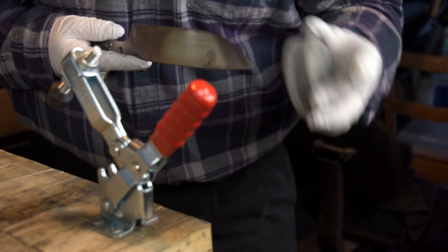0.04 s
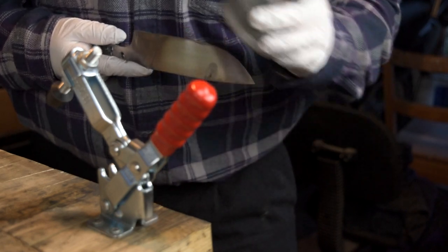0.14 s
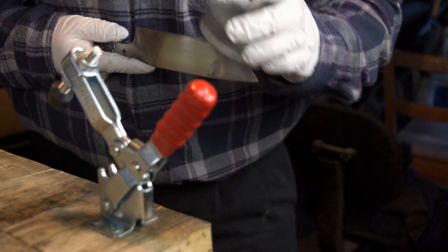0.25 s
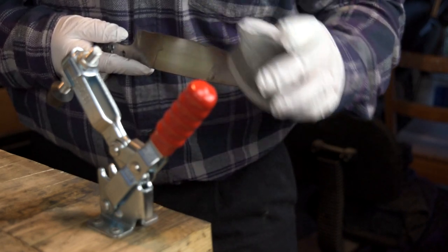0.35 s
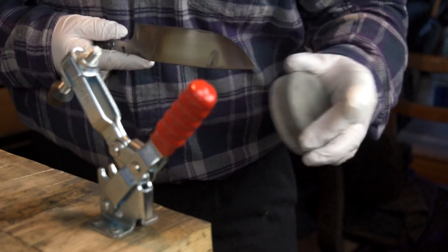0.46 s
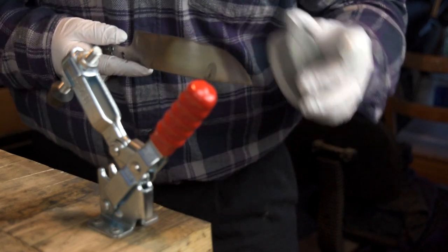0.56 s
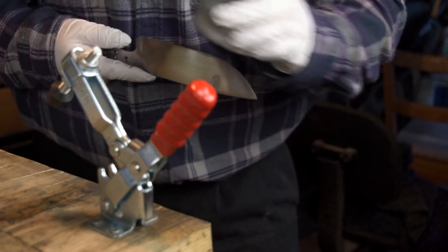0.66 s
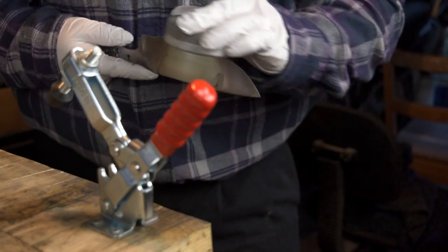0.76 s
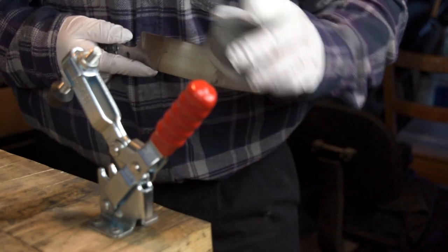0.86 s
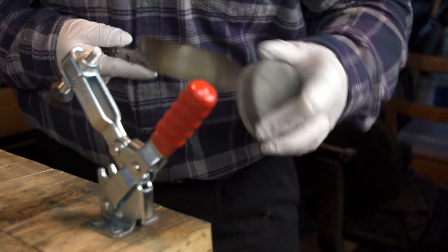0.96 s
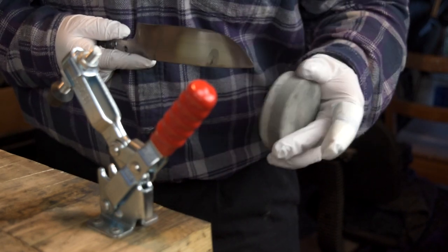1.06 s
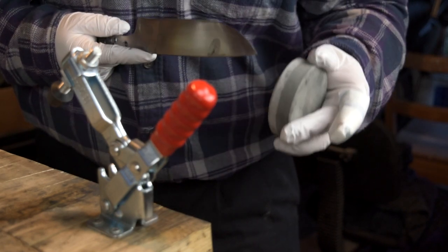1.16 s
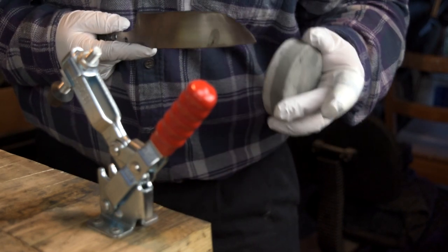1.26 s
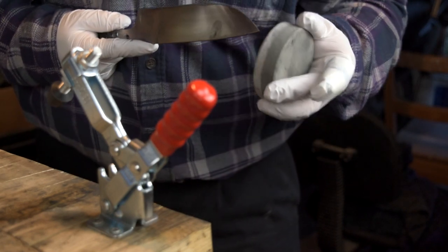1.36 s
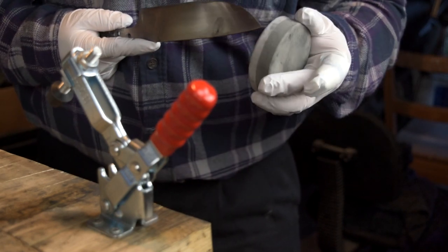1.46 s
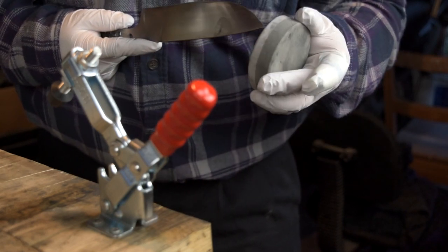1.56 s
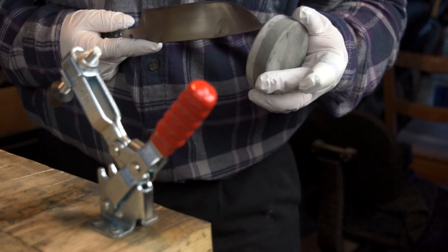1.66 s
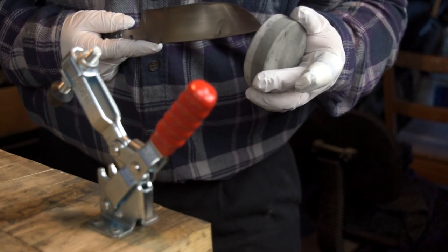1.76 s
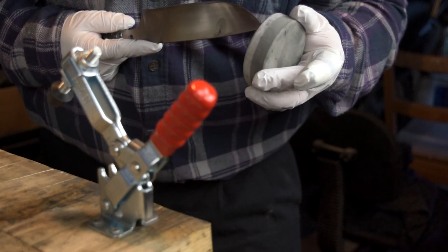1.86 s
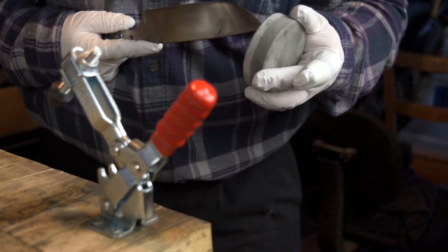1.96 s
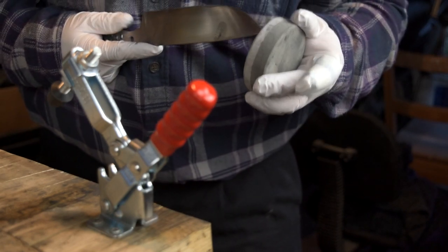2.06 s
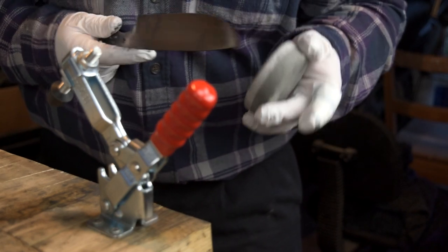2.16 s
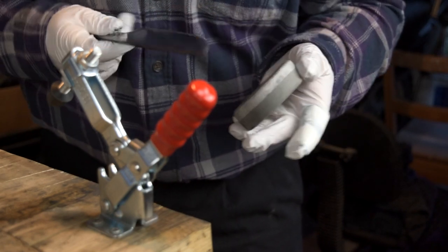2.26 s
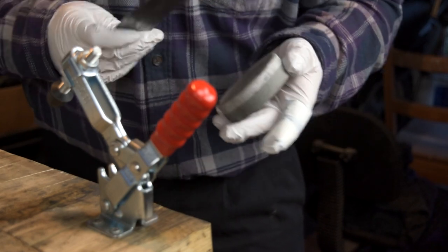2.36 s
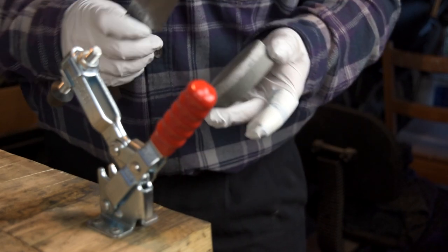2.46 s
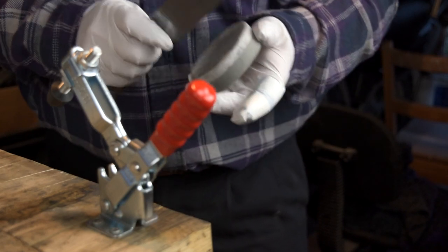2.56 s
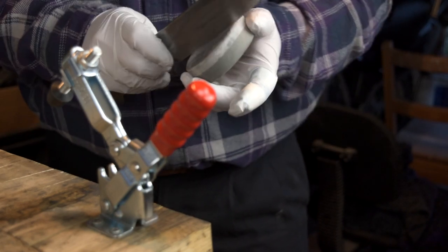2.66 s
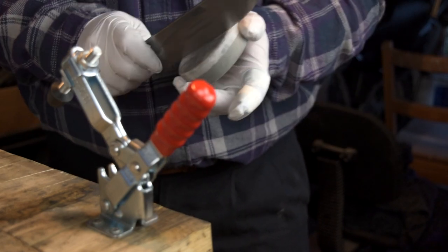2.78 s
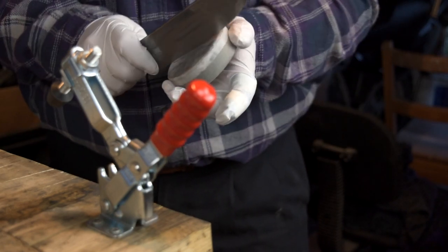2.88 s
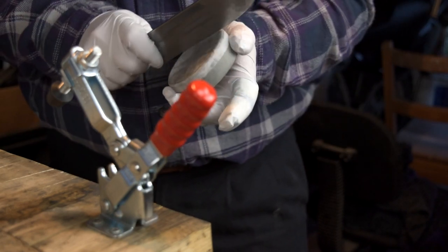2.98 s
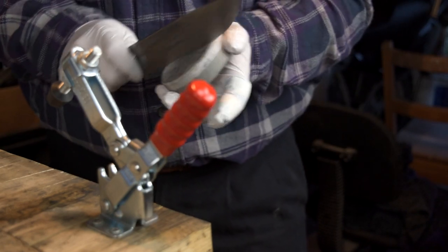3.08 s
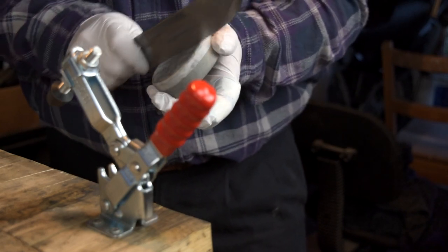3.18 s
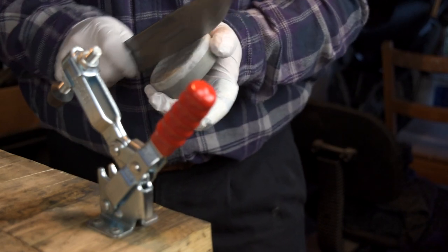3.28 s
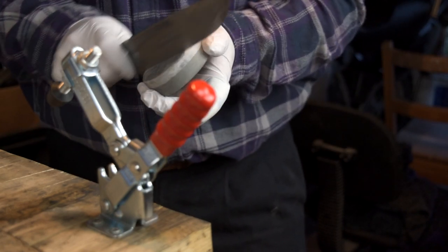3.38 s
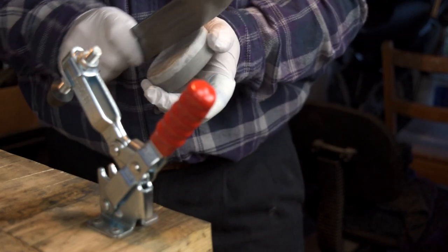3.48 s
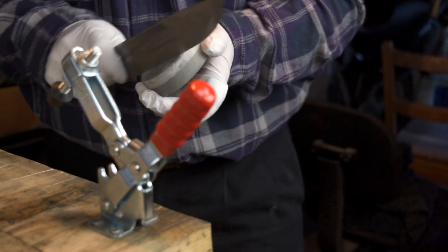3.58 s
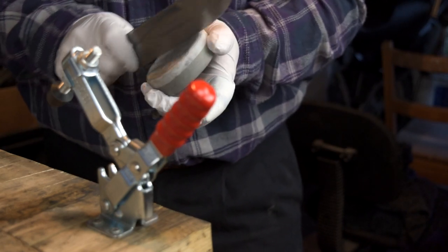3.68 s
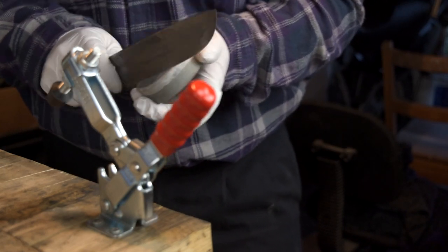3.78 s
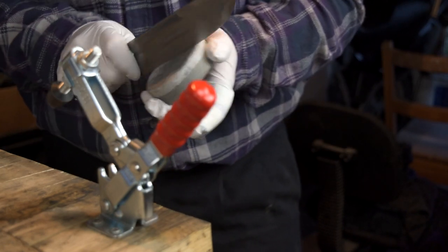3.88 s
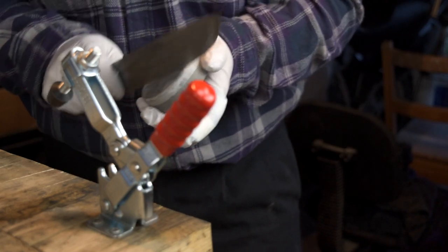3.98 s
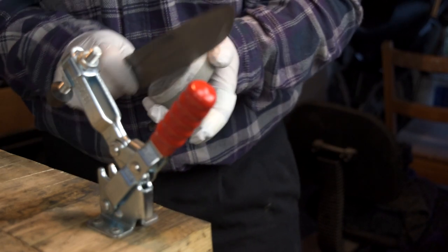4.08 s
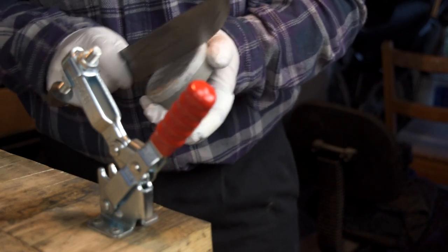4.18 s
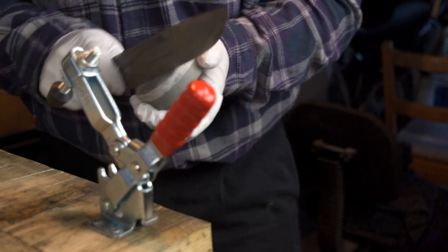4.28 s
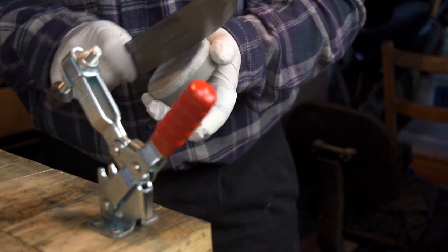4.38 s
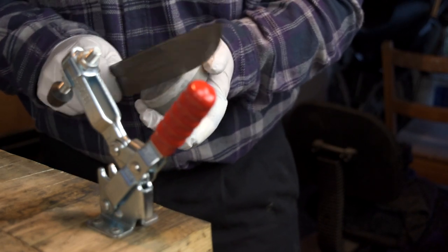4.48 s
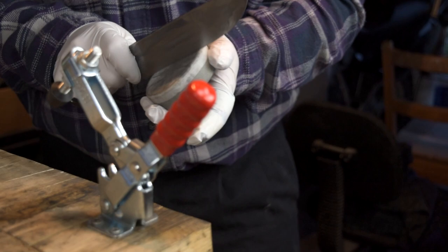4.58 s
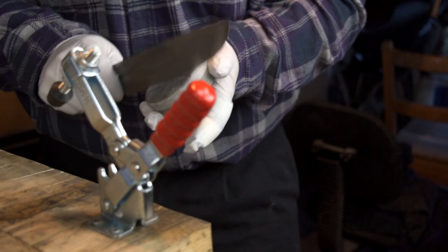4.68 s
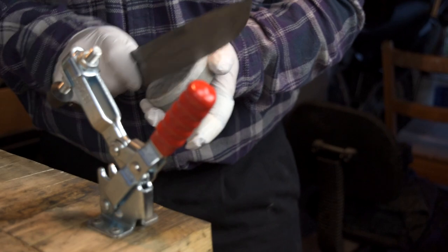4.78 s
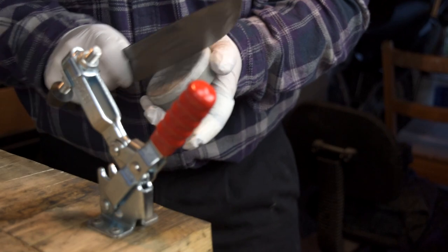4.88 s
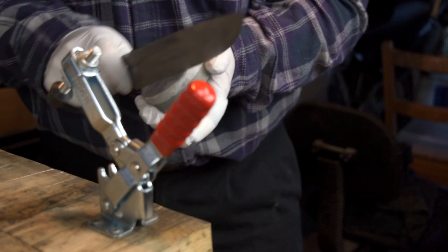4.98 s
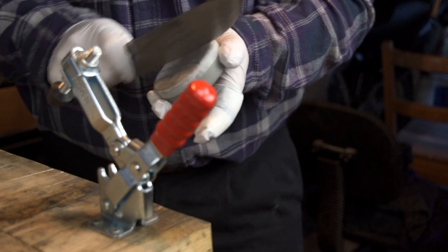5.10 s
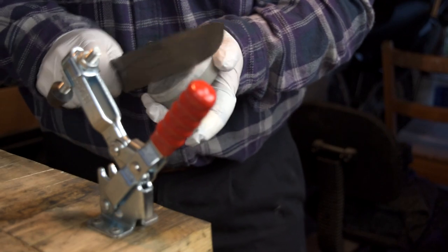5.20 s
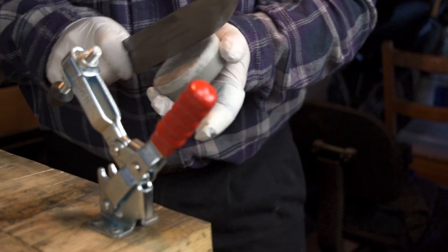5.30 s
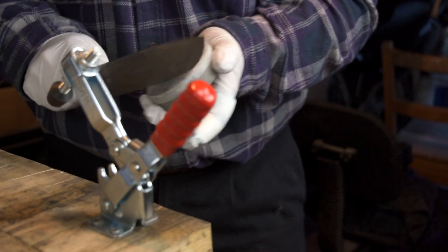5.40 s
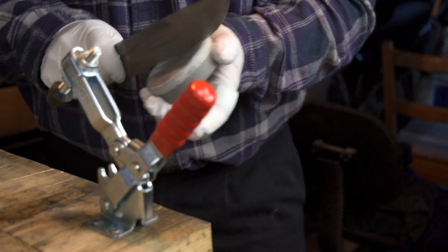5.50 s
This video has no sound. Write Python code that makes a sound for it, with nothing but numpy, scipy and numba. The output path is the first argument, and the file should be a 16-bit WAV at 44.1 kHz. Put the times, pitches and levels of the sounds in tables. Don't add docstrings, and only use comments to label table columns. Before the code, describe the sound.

A quiet, small workshop, heard close and in mono, with soft low air noise and faint machine hum. Gloves rub barely audibly before a hard, dull stone-on-steel clack at 0.25 s opens a short gritty drag, fading by 0.47 s with a light tick. A second clack at 0.76 s starts another hissing drag until about 1.02 s, ending in small taps. Then near silence, with a faint tick at 1.75 s. From 2.05 to 2.68 s gloves softly rub steel with tiny clicks, and slight low handling rumble begins. Strong knocks at 2.69 and 2.83 s and a brief drag lead to rapid strokes from 2.94 s, with more sharp knocks near 2.97 and 3.0 s. About nine scrapes per second alternate push and pull, raspy, with blade ringing around 3.4 kHz, irregular grain catches and a hollow tone that flares upward on pulls and gradually rises, continuing to about 5.56 s.

```python
import sys
import numpy as np
from scipy import signal
from scipy.fft import rfft, irfft, next_fast_len
from scipy.io import wavfile
from scipy.ndimage import uniform_filter1d, minimum_filter1d
from numba import njit

SR = 44100
rng = np.random.default_rng(int(sys.argv[2]) if len(sys.argv) > 2 else 0)


def store_pcm(level_fs):
    pcm = np.round(np.clip(level_fs, -1, 1) * 32767).astype(np.int16)
    wavfile.write(sys.argv[1], SR, np.atleast_2d(pcm).T)


def level_to_linear(level):
    exponent = np.asarray(level, float) / 20
    return 10 ** exponent


N = 244572

# t/s, share of the stroke at top speed (0-1), pressure level/dB, main mode relative level/dB
STROKES = [(2.939, 0.31, -23, 5.5), (3.057, 0.47, -21.5, -2), (3.174, 0.4, -22.5, 4),
           (3.288, 0.56, -20.5, 0), (3.404, 0.53, -21.5, 1.5), (3.517, 0.49, -19.5, 3.5),
           (3.622, 0.39, -21.5, -1.5), (3.735, 0.41, -22.5, 6.5), (3.841, 0.37, -21, 7),
           (3.965, 0.37, -21.5, 8.5), (4.076, 0.43, -21.5, 2.5), (4.199, 0.41, -21.5, 5),
           (4.316, 0.44, -21.5, 2.1), (4.431, .49, -20, 6), (4.534, 0.51, -23.5, 0),
           (4.664, 0.47, -22, -5.5), (4.768, .46, -22, 3.5), (4.9, 0.45, -22.5, 5.5),
           (5.012, 0.45, -22.5, 2.5), (5.131, 0.6, -21, -3), (5.231, 0.31, -23, 9),
           (5.357, 0.49, -20.5, -4), (5.463, 0.59, -23.5, 1.5)]
LAST_TURN_S = 5.562
TURN_DB, STROKE_SHAPE = -13, 1.426
# opening/octave, coupling level/dB
PALM_CUPPING = [(0.48, -1), (0.3, -2.5), (-0.061, 0), (0.11, -2.3), (-0.045, -1.2), (0.085, 0),
                (-0.14, -0.3), (0.098, 1.2), (-0.004, -0.4), (-0.11, .6), (-.03, -0.8), (0.0049, 2),
                (0.0087, 4.5), (0.087, -3.5), (0.11, 1.7), (-0.005, -0.5), (-0.032, -1.8), (-0.07, -0.5),
                (-0.022, 1.6), (0.11, 0.5), (0.12, -3.5), (0.17, 2.5), (-0.089, -0.2)]
# t/s, peak level/dB
SNAGS = [(3.0703, 19.5), (3.2, 2), (3.338, 8), (3.4219, 11), (3.7741, 16), (3.8215, 16), (3.8744, 7),
         (3.9911, -1), (4.141, 13), (4.4606, -4), (4.7292, 16.5), (4.9305, 4), (4.71, -5), (4.958, 21),
         (5.0535, -11), (5.068, -13), (5.264, 6), (5.3946, 10)]
# f/Hz, width/Hz
MAIN_MODE = (3395, 76)
BLADE_HZ = [4500, 5570, 6930, 7720, 8390, 9560, 11200, 12700, 13600, 14500, 1705, 1985, 2585, 2880, 3720]
# width/Hz, level/dB
UPPER_MODES = [(154, 4), (133, 3), (129, 3.5), (88.889, 1), (167, -5.5), (231, -1.5), (175.93, -17),
               (230, -6.5), (101.85, -11), (150, -20)]
# width/Hz, level/dB
LOWER_MODES = [(67.5, -2), (146, -34.5), (118.8, 3), (270, 7.5), (117, -5)]
NARROWEST_HZ = 70
PITCH_BEND = .011
UPPER_DB, PULL_UPPER_DB = 4, -1.86
# f/Hz, density level/dB per Hz
RASP = [(1000, -18), (2000, 3.5), (3200, 8), (4200, -2.5), (6300, -3.5), (9000, -4.5), (12000, -4.5),
        (15500, -14)]
RASP_DB, PULL_DIP_DB = 2, -4.5
HOLLOW_DB, PULL_HOLLOW_DB, HOLLOW_TRADE = -1.16, -1.5, 0.27
HOLLOW_HZ, LOOSEN_OCT_PER_S, OPEN_OCT, OPEN_S, CLOSE_S = 524, 0.21, 0.91, 0.018, 0.043

# t/s, pressure level/dB, bite on the edge level/dB, body peak f/Hz
DRAGS = [
    [(0.262, -23.5, -8, 3110), (0.3, -39.5, 4, 2610), (0.354, -29, -9, 2430), (0.44, -42, 10.5, 2840),
     (0.467, -41.5, 3.5, 2710)],
    [(0.772, -41, -36, 2430), (0.8, -34.5, -2.5, 2300), (0.888, -32, -2.5, 2780), (0.99, -31, 0.5, 2340),
     (1.01, -26, 7, 2710), (1.021, -45.5, 16, 2660)],
    [(2.835, -22, -12, 2500), (2.853, -42, -22, 2220), (2.88, -42, -6, 2300), (2.89, -33, 1, 2500),
     (2.905, -49, -5, 2600), (2.92, -31.5, 2.5, 2700), (2.945, -46, -28, 2730)],
]
# f/Hz, width/Hz, level/dB
DRAG_MODES = [(1285, 160, -3), (3820, 160, -6), (4580, 67, -1.5), (5920, 53, -4.5), (6970, 88, -3.5),
              (8350, 250, 4), (8330, 85, 1.5), (9900, 270, -8), (10350, 240, -15.5), (11060, 180, -2.5),
              (13800, 250, -7.5)]
# f/Hz, density level/dB per Hz
DRAG_HISS = [(290, -49), (500, -3), (876, -20), (1170, -18), (1800, 3.5), (2840, -27), (4250, -1.5),
             (8480, 2), (15500, -23)]
PALM_DB, PALM_FADE_DB_PER_S = -2.5, 230

# t/s, level/dB, brightness on bare steel level/dB
GLOVE_SLIDES = [
    [(0.0, -51, -12), (0.214, -57.5, -10), (0.235, -68, -27)],
    [(1.06, -54, 6), (1.11, -61, -13), (1.55, -76, -6)],
    [(2.05, -75, -10), (2.082, -58.5, -7), (2.27, -50, 1), (2.5, -48.5, -11), (2.532, -42.5, 2.5),
     (2.574, -47.5, -7), (2.66, -50, -5), (2.685, -41, -25)],
]
# f/Hz, density level/dB per Hz
GLOVE_TONE = [(290, -17), (500, 6), (578, -2), (669, 2), (2010, -5), (3280, 2), (3800, -5.5), (4480, 1),
              (6000, -22), (7800, -46), (13200, -120)]
# f/Hz, width/Hz, level/dB
GLOVE_MODES = [(4500, 81, -9), (5640, 130, 1), (7180, 68, 0), (8140, 180, 0)]

# t/s, peak level/dB, knock f/Hz, knock t60/s, ring relative level/dB
LANDINGS = [
    (0.2514, 2, 1750, 0.007, -16),
    (.761, 0.5, 1694, 0.006, -10),
]
# delay t/s, level/dB, pitch ratio
BOUNCES = [(.0008, -10, 1.9), (.0025, -8, 1.38), (.0053, -12, 1.18), (.01, -24, 1.2)]
BOUNCE_T60_S, BOUNCE_RING_DB = 0.013, -20
# t/s, peak level/dB, knock f/Hz, knock
# t60/s, ring relative level/dB
TAPS = [(0.4336, -22.5, 2930, 0.018, -3), (.998, -28, 690, 0.027, -14), (1.0101, -28, 1560, 0.021, -11),
        (1.0137, -32, 2630, 0.0098, 3), (1.754, -33.5, 1220, 0.014, -2), (2.103, -46.5, 3040, 0.01, 8),
        (2.153, -44, 3400, .01, -12), (2.41, -49, 4500, 0.15, -30), (2.431, -38.5, 4500, 0.11, -30),
        (2.195, -45, 3600, .01, -3), (2.529, -29.5, 3370, 0.034, -2), (2.8253, -3, 2870, 0.013, -26),
        (2.826, -1.5, 1930, 0.012, -25), (2.845, -18, 2040, 0.016, -22), (2.961, -21, 510, 0.033, -24),
        (2.9719, 1.5, 2740, 0.0077, -5.5)]
# t/s, peak level/dB, knock f/Hz, knock t60/s, ring relative level/dB
GLANCES = [
    (2.691, -3.5, 1830, 0.009, -9),
    (3.0052, -6.5, 3330, 0.015, -7.5),
]
# f/Hz, level/dB, t60/s
FREE_BLADE = [(1421, -20, .1), (2546, -4, .09), (3714, -22, .15), (4495, -14, .06), (4883, -25, .12),
              (5669, -1, .03), (6966, -4, .035), (7747, -5, .06), (8500, -6, .03), (9690, -7, .035),
              (11400, -13, .02)]
PRESSED_FREE, TOUCHED_FREE, GLANCED_FREE = .08, .35, .8
CRACK_DB, CRACK_T60_S, CRUSH_T60_SHARE, CRUSH_WIDTH = -9, .013, 1.3, .45

SHOP_T60_S, SHOP_DB, WALL_CUT_HZ = 0.31, -19, 1350
# f/Hz, density level/dB per Hz
AIR = [(15, -47), (25, -20), (48, -7), (140, -5), (169, -1), (281, -14), (666, -11.5), (1050, -13),
       (1710, -19.5), (2360, -25.5), (6550, -37.5), (7100, -35.5), (15500, -35.5)]
AIR_DB = -45
# f/Hz, width/Hz, level/dB
HUM = [(53, 10, -56), (118.6, 39, -59.5), (169.7, 3.5, -57), (212.3, 10.6, -59.5)]
# t/s, level/dB
JOLTS = [(4.94, -45), (5.25, -40)]
RUMBLE_FROM_S, RUMBLE_DB, JOLT_S = 2.33, -47.5, 0.066

DUCK_AHEAD_S, DUCK_ENDS_S, DUCK_OVER_DB, DUCK_KEEP_HZ, DUCK_DEPTH = .013, .0055, 39, 600, .93
CEILING = .95


def rms_one(x):
    return x / np.sqrt(np.mean(x ** 2) + 1e-20)


def filtered(x, order, hz, kind="low"):
    return signal.sosfilt(signal.butter(order, hz, kind, fs=SR, output="sos"), x)


def in_spans(tables, fade_s):
    t, rows = np.arange(N) / SR, np.concatenate(tables)
    gate = sum((t >= table[0][0]) & (t <= table[-1][0]) for table in tables)
    gate = uniform_filter1d(np.minimum(gate, 1.), size=max(int(fade_s * SR), 1))
    return [gate] + [np.interp(t, rows[:, 0], column) for column in rows.T[1:]]


def drift(rate):
    r = np.exp(-80 * np.pi * rate / SR)
    noise = rng.standard_normal(N // 40 + 2002)
    slow = signal.lfilter([1], [1, -2 * r, r * r], noise)[2000:]
    return np.interp(np.arange(N) / 40, np.arange(len(slow)), rms_one(slow))


def colour(x, points):
    size = next_fast_len(N)
    hz = np.maximum(np.fft.rfftfreq(size, 1 / SR), 10)
    f, db = np.transpose(points)
    below = 30 * np.maximum(np.log2(f[0] / hz), 0)
    gain = level_to_linear(np.interp(np.log(hz), np.log(f), db) - below)
    return irfft(rfft(x, size) * rms_one(gain), size)[:N]


def resonance(x, hz, width_hz):
    r = np.exp(-np.pi * width_hz / SR)
    poles = [1, -2 * r * np.cos(2 * np.pi * hz / SR), r * r]
    return signal.lfilter((1 - r * r) / 2 * np.array([1, 0, -1]), poles, x + 1e-18)


def loudness(width_hz):
    return np.sqrt(SR / (np.pi * width_hz))


@njit
def moving_peak(x, hz, q, rate):
    y = np.zeros(len(x))
    for i in range(2, len(x)):
        r = np.exp(-np.pi * hz[i] / q / rate)
        drive = np.sqrt((1 - r * r) / 2) * (x[i] - x[i - 2])
        y[i] = drive + 2 * r * np.cos(2 * np.pi * hz[i] / rate) * y[i - 1] - r * r * y[i - 2]
    return y


def grit(per_s, spread_db, clump_db):
    sizes = level_to_linear(spread_db * np.minimum(rng.exponential(1, N), 4)) * rng.choice([-1, 1], N)
    catches = rng.random(N) < per_s / SR
    return rms_one(sizes * catches * level_to_linear(clump_db * drift(73)))


def modes(force, table, wander_db, rate):
    out = np.zeros(N)
    for k, (hz, width_hz, db) in enumerate(table):
        drive = force * level_to_linear(db + wander_db * drift(rate))
        out += (-1) ** k * resonance(drive, hz, max(width_hz, NARROWEST_HZ))
    return out / np.sqrt(sum(level_to_linear(2 * db) / loudness(width_hz) ** 2 for hz, width_hz, db in table))


def quick_strokes():
    t, rows = np.arange(N) / SR, np.array(STROKES)
    turns = np.append(rows[:, 0], LAST_TURN_S)
    tops = rows[:, 0] + np.clip(rows[:, 1], .2, .8) * np.diff(turns)
    knots = np.sort(np.append(turns, tops))
    phase = np.interp(t, knots, np.arange(len(knots)) / 2)
    speed = np.abs(np.sin(np.pi * phase)) ** STROKE_SHAPE
    speed = speed + level_to_linear(TURN_DB) * np.clip((t - turns[0]) / 0.014, 0, 1)

    bursts = np.zeros(N)
    bursts[[round(s * SR) for s, db in SNAGS]] = level_to_linear(np.array(SNAGS)[:, 1] - 6.0)
    bursts = uniform_filter1d(bursts, size=150, origin=-74)
    fall = np.exp(-1 / (0.0056 * SR))
    speed = speed + 0.23 * signal.lfilter([1], [1, -fall], bursts)

    which = np.clip(phase.astype(int), 0, len(rows) - 1)
    lower_db = uniform_filter1d(rows[which, 2], size=600)
    ring_db = uniform_filter1d(rows[which, 3], size=600)
    pull = uniform_filter1d(which % 2., size=600)
    palm_oct, cup_db = uniform_filter1d(np.array(PALM_CUPPING)[which].T, size=600)
    upper_db = lower_db + UPPER_DB + PULL_UPPER_DB * pull
    hollow_db = lower_db + HOLLOW_DB + PULL_HOLLOW_DB * pull - HOLLOW_TRADE * ring_db + cup_db

    force = speed * grit(9000, spread_db=2.5, clump_db=1.5)
    mode_hz, width_hz = MAIN_MODE
    main_hz = mode_hz * (1 + PITCH_BEND * drift(7.7))
    main_db = lower_db + ring_db - 2.5 + 2.6 * drift(19.4)
    main = moving_peak(force * (speed + 0.0092) ** 0.44 * level_to_linear(main_db), main_hz, mode_hz / width_hz, SR)
    blade = [(hz, *shape) for hz, shape in zip(BLADE_HZ, UPPER_MODES + LOWER_MODES)]
    split = len(UPPER_MODES)
    upper_force = force * (speed + .01) ** 0.028 * level_to_linear(upper_db - 2.5)
    upper = modes(upper_force, blade[:split], wander_db=3, rate=12.6)
    lower = modes(force * level_to_linear(lower_db), blade[split:], wander_db=4.0, rate=12.4)
    rasp = colour(force * level_to_linear(lower_db + RASP_DB + PULL_DIP_DB * (which % 2)), RASP)

    since = np.maximum(t - turns[1::2, None], 0)
    opening = np.sum(np.exp(-since / CLOSE_S) - np.exp(-since / OPEN_S), axis=0)
    hollow_oct = LOOSEN_OCT_PER_S * (t - turns[0]) + OPEN_OCT * opening + palm_oct
    hollow_oct = hollow_oct + 0.16 * drift(20.4)
    hollow_oct = hollow_oct + 0.36 * (.5 - phase % 1)
    hollow_hz = HOLLOW_HZ * 2 ** hollow_oct
    push = force * speed * level_to_linear(hollow_db + 3.6 * drift(28.0))
    hollow = level_to_linear(-5.0) * moving_peak(push, hollow_hz, 5.5, SR)
    hollow = hollow + level_to_linear(-13.0) * moving_peak(push, 1.34 * hollow_hz, 3.7, SR)
    return main + upper + lower + rasp + filtered(hollow, 3, 300, "high")


def slow_drags():
    gate, body_db, edge_db, body_hz = in_spans(DRAGS, fade_s=.005)
    ends = np.array([(table[0][0], table[-1][0]) for table in DRAGS]).reshape(-1, 1)
    from_end_s = np.min(np.abs(np.arange(N) / SR - ends), axis=0)
    palm_db = PALM_DB - PALM_FADE_DB_PER_S * from_end_s
    force = gate * level_to_linear(body_db) * grit(11000, spread_db=2.5, clump_db=2.3)
    body = level_to_linear(-2.0) * moving_peak(force * level_to_linear(1.07 * drift(30)), body_hz, 5.0, SR)
    edge = level_to_linear(-2.5) * modes(force * level_to_linear(edge_db), DRAG_MODES, wander_db=4.5, rate=23)
    palm = level_to_linear(-5.0) * loudness(500) * resonance(force * level_to_linear(palm_db), 750, 250)
    hiss = level_to_linear(-9.5) * colour(force * level_to_linear(1.87 * edge_db), DRAG_HISS)
    return body + edge + palm + hiss


def gloves():
    gate, level_db, bright_db = in_spans(GLOVE_SLIDES, fade_s=0.05)
    force = gate * level_to_linear(level_db) * grit(15000, spread_db=-5.0, clump_db=1.6)
    bright_force = force * level_to_linear(bright_db)
    dull = filtered(colour(force, GLOVE_TONE), 4, 5000)
    sheen = filtered(bright_force, 2, [4500, 13000], "band")
    ring = modes(bright_force, GLOVE_MODES, wander_db=6.5, rate=9.1)
    return level_to_linear(4.0) * dull + level_to_linear(-1.5) * sheen + level_to_linear(-6.5) * ring


def touches():
    bounces = []
    for s, db, hz, t60, ring_db in LANDINGS:
        for lag, loss_db, ratio in BOUNCES:
            bounces.append((s + lag, db + loss_db, hz * ratio, BOUNCE_T60_S, BOUNCE_RING_DB))
    groups = ((LANDINGS, PRESSED_FREE), (bounces + TAPS, TOUCHED_FREE), (GLANCES, GLANCED_FREE))
    return [(*row, free) for rows, free in groups for row in rows]


def taps():
    out = np.zeros(N)
    t = np.arange(int(.25 * SR)) / SR
    # frequency ratio to the knock, level/dB
    stone = ((.2, -26), (.4, -8.5), (.62, -25), (.82, -7), (1.0, -2), (1.25, -8.5), (1.5, -18), (1.75, -32))
    for s, db, hz, t60, ring_db, free in touches():
        partials = [(hz * ratio, level_db, t60) for ratio, level_db in stone]
        for f, level_db, decay in FREE_BLADE:
            partials.append((f, level_db + ring_db + 1.2 * rng.standard_normal(), free * decay))
        hit = np.zeros(len(t))
        for f, level_db, decay in partials:
            hit += level_to_linear(level_db - 60 * t / max(decay, .003)) * np.sin(2 * np.pi * f * t)
        hit += level_to_linear(ring_db + CRACK_DB - 60 * t / CRACK_T60_S) * rng.standard_normal(len(t))
        crush = resonance(rng.standard_normal(len(t)), hz, CRUSH_WIDTH * hz)
        hit += level_to_linear(-1.0 - 60 * t / max(CRUSH_T60_SHARE * t60, .003)) * crush
        i = round(s * SR)
        out[i:i + len(t)] += level_to_linear(db) * hit * np.clip(t / 0.00039, 0, 1)
    return filtered(out, 1, [300, 11000], "band")


def shop(x):
    t = np.arange(int(.8 * SR)) / SR
    tail = rng.standard_normal(len(t)) * level_to_linear(-60 * t / SHOP_T60_S) * np.clip(t / 0.0099, 0, 1)
    tail = filtered(tail, 1, WALL_CUT_HZ)
    return signal.fftconvolve(x, tail / np.sqrt(np.sum(tail ** 2)))[:N]


def background():
    air = level_to_linear(AIR_DB - 3.0 + 0.5 * drift(7.6)) * colour(rng.standard_normal(N), AIR)
    hum = sum(level_to_linear(db) * rms_one(resonance(rng.standard_normal(N), hz, width_hz)) for hz, width_hz, db in HUM)
    t = np.arange(N) / SR
    shake = level_to_linear(RUMBLE_DB + 1.5 * drift(4)) * np.clip((t - RUMBLE_FROM_S) / .3, 0, 1)
    shake = shake + sum(level_to_linear(db) * np.exp(-np.abs(t - s) / JOLT_S) for s, db in JOLTS)
    low = filtered(rng.standard_normal(N), 3, [35, 125], "band")
    return air + hum + shake * rms_one(low)


def scene():
    near = quick_strokes() + slow_drags() + gloves() + taps()
    return (near + level_to_linear(SHOP_DB) * shop(near) + background())[None]


def duck(x):
    ahead, ends = int(DUCK_AHEAD_S * SR), int(DUCK_ENDS_S * SR)
    recent = np.sqrt(uniform_filter1d(x ** 2, size=800, origin=399) + 1e-12)
    jump = np.roll(np.abs(x), -ends, axis=1) > level_to_linear(DUCK_OVER_DB) * recent
    span = ahead - ends
    shut = -minimum_filter1d(-1. * jump, size=span, origin=-(span // 2))
    bass = signal.sosfiltfilt(signal.butter(2, DUCK_KEEP_HZ, fs=SR, output="sos"), x)
    return x - DUCK_DEPTH * uniform_filter1d(shut, size=80) * (x - bass)


def roll_off(x):
    return signal.sosfilt(signal.butter(12, 15950, fs=SR, output="sos"), x)


def record(dry):
    clipped = np.clip(duck(dry), -CEILING, CEILING)
    top_cut = signal.cheby2(12, 45, 16150, fs=SR, output="sos")
    mix = signal.sosfilt(top_cut, clipped)
    return roll_off(mix)


dry = scene()
out = record(dry)
store_pcm(out)
```